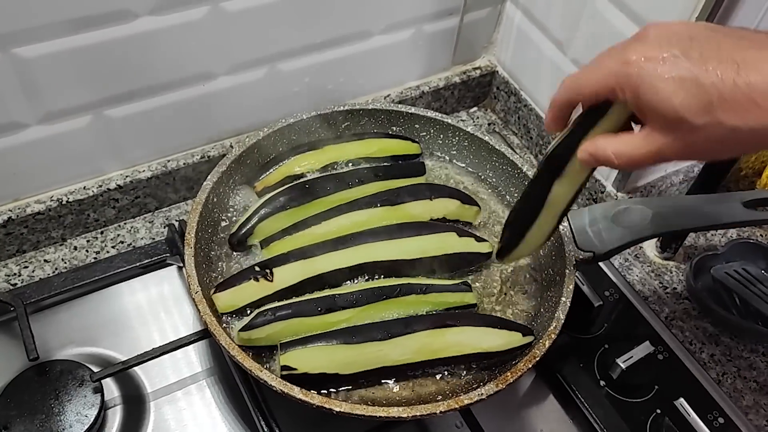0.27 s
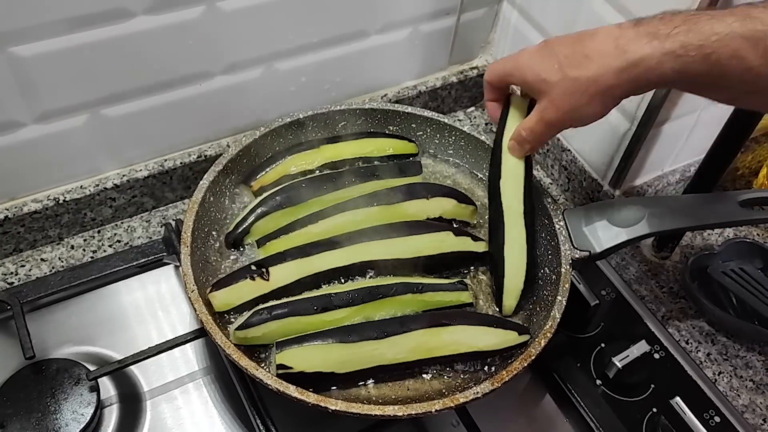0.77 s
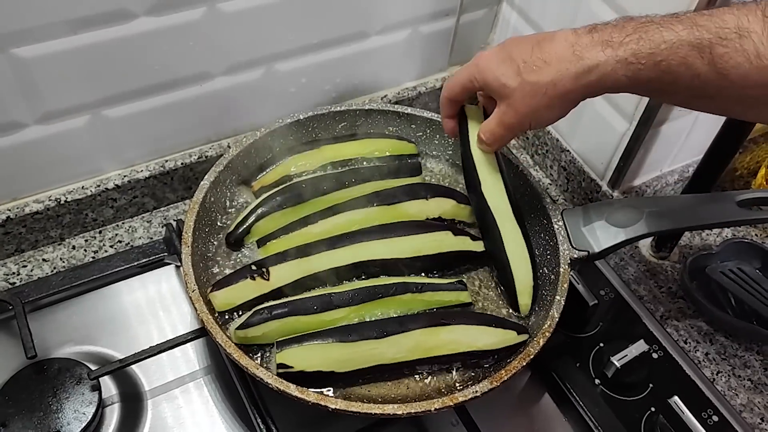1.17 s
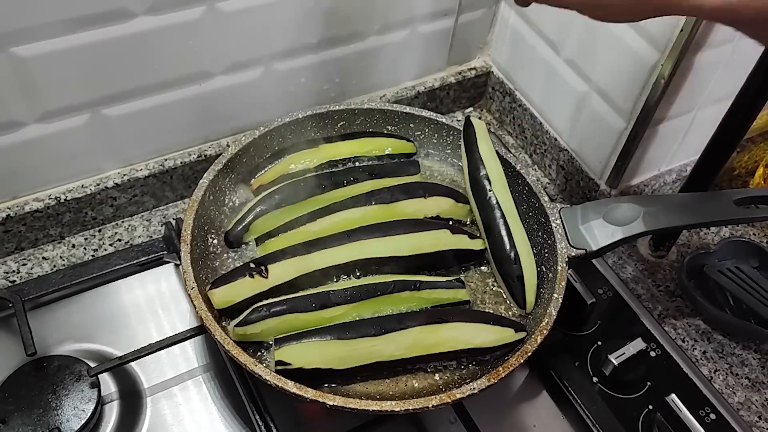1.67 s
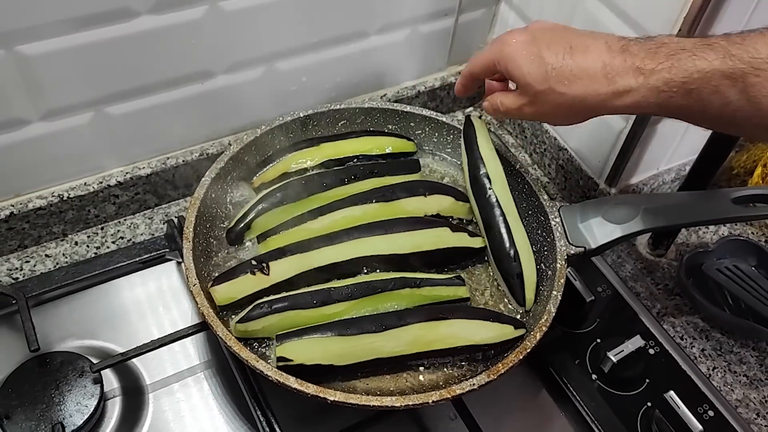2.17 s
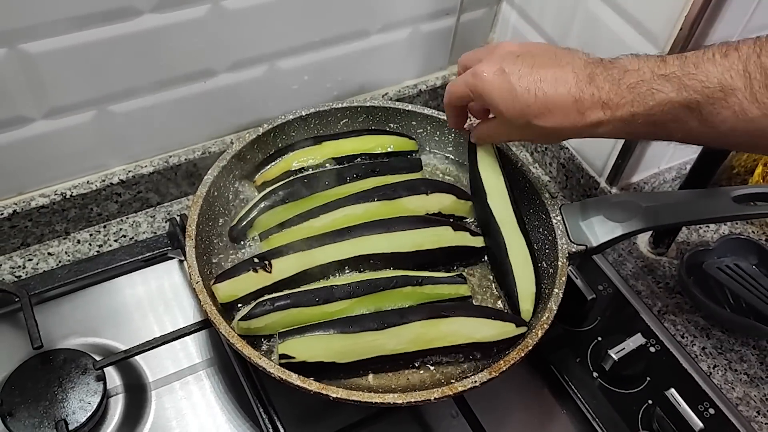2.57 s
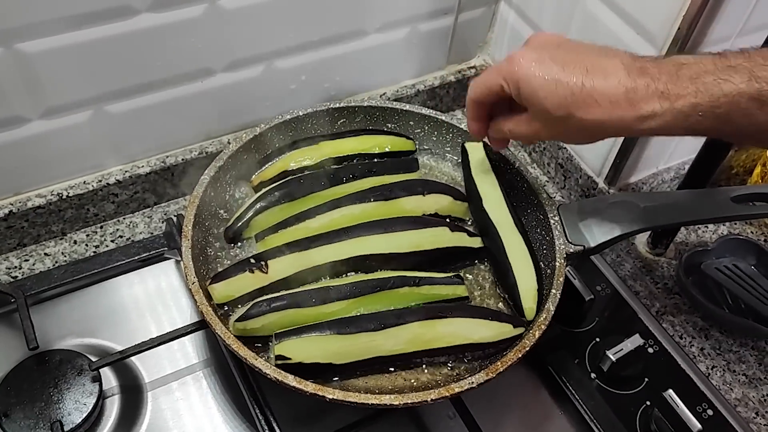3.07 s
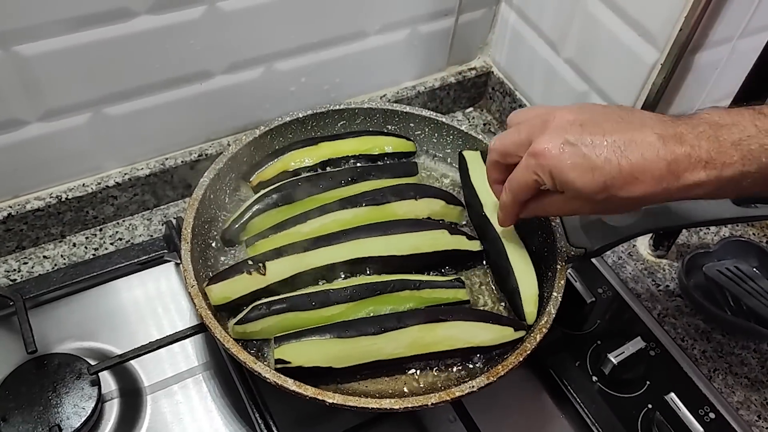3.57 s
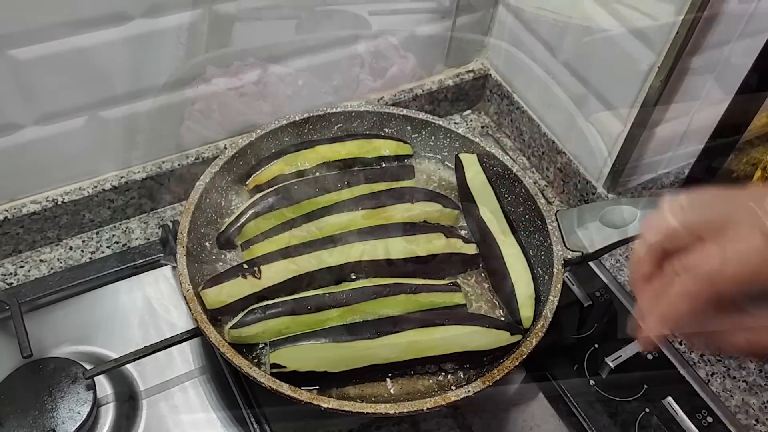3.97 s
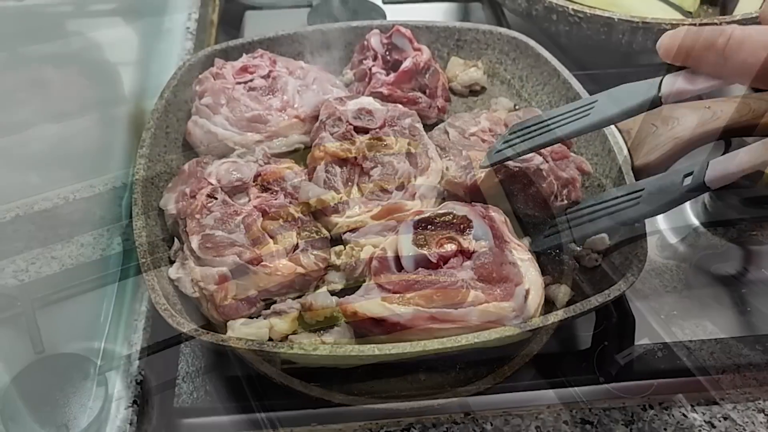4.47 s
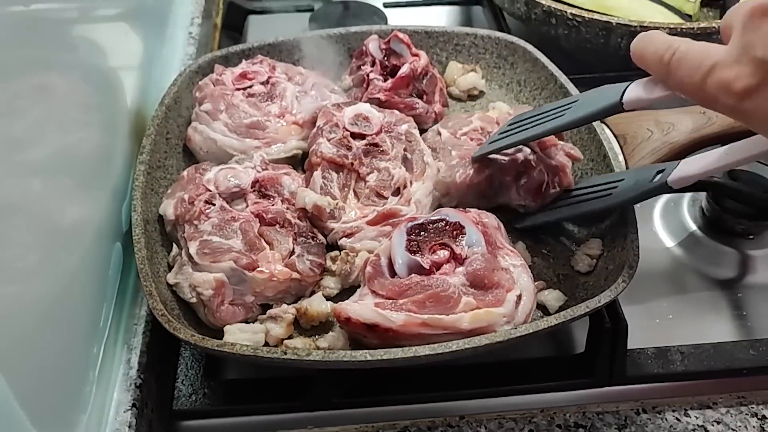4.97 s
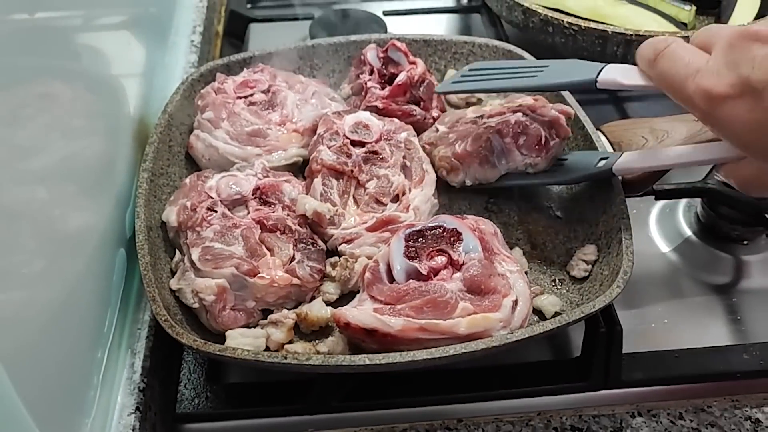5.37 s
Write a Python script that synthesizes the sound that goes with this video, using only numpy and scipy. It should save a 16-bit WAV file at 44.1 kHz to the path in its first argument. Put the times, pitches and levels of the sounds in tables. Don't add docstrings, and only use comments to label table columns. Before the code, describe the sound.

Close stereo sound of vegetable slices frying in a wide pan: a steady, dense hiss of tiny bubbles with wet pops, thin spits and sharp oil cracks. Just before four seconds it stops dead; after a tiny gap, meat frying in a second pan fades in, quieter at first, then stronger and more crackly. Hard tiles give short echoes; an extractor hood rumbles faintly.

```python
import sys
import numpy as np
from scipy import signal
from scipy.fft import rfft, irfft
from scipy.io import wavfile

SR = 44100
rng = np.random.default_rng(int(sys.argv[2]) if len(sys.argv) > 2 else 0)


def unload_wav(signal):
    wavfile.write(
        sys.argv[1],
        SR,
        np.round(np.clip(np.atleast_2d(signal).T, -1, 1) * 32767).astype(np.int16),
    )


def voltage_ratio(decibels):
    exponent = np.asarray(decibels, float) / 20
    return 10 ** exponent


N = 246959
CUT_S = 3.8772
SHOT_S = CUT_S + .03

# t/s, fizz level/dB
BOIL = [
    [(.05, -28.5), (1.0, -29), (2.2, -29), (2.8, -29), (3.3, -29.4), (3.8, -28.5)],
    [(4.2, -32), (4.55, -32.5), (4.76, -30.5), (4.9, -31), (5.1, -29), (5.31, -28.5), (5.55, -26.5)],
]


def sizzle(per_s, uneven_db, cycles, surge_db):
    # f/Hz, level/dB per Hz
    slices_colour = [(290, -27), (500, -15), (586, -15), (666, -17), (927, -14), (1030, -11), (1820, -3.5),
                     (2360, -4), (3060, -5.5), (3430, -3.5), (7560, -6.5), (8720, -5.5), (10400, -10),
                     (13800, -7.5), (15500, -8)]
    meat_colour = [(290, -31), (500, -13), (815, -13.5), (982, -6), (1200, -6.5), (1770, -1), (2570, -3),
                   (3280, -5), (3790, -2.5), (4840, -5), (6090, 1), (7670, -5), (8850, 0), (10100, -5.5),
                   (15500, -3.5)]
    # f/Hz, level/dB
    port_balance = [
        [(380, 5), (700, -7), (1200, -3.5), (1800, -4), (2700, -6.5), (4200, -4), (5500, -3), (6500, 2.5),
         (8000, -1.5), (10000, 5), (15000, 1.5)],
        [(380, -1), (700, -1), (1200, -1.5), (1800, -3.5), (2700, -4.5), (4100, -.5), (5200, -3), (6300, -2.5),
         (7600, -3.5), (8900, 2), (11000, 4), (15000, 1)],
    ]
    fizz_db = in_time(BOIL)
    bubbles_db = bubbling(fizz_db)
    surge = surge_db * drift(22)
    pitches = np.geomspace(600, 15000, 16)
    bursts = 0
    for hz in pitches:
        wait, size, place, sign = rng.random((int(hz * 4) + 3000, 4)).T
        gaps_s = -np.log(1 - wait) / per_s * pitches.sum() / hz
        at = (np.cumsum(gaps_s) * SR).astype(int)
        small = np.clip(np.log(hz / 3500) / np.log(6000 / 3500), 0, 1)
        level_db = (1 - small) * bubbles_db + small * fizz_db + surge + 0.29 * drift(35)
        burst_db = level_db[at % N] - uneven_db * np.log(1 - .98 * size)
        sizes = np.sign(sign - .5) * voltage_ratio(burst_db) * (at < N)
        aside = voltage_ratio(np.outer([1, -1], 1.15 * (place - .5)))
        lag = 6.0 + 26.0 * (place - .5)
        bursts = bursts + ring(at_ports(at, sizes * aside, lag), hz, cycles / hz)

    hz = np.clip(np.fft.rfftfreq(N, 1 / SR), 1, 15500)
    low_cut = (hz / 500) ** 2 / (1 + (hz / 500) ** 2)
    shots = np.split(np.arange(N), [round(SHOT_S * SR)])
    pans = []
    for colour, balance, part in zip([slices_colour, meat_colour], port_balance, shots):
        f, raw = signal.welch(bursts[:, part], SR, nperseg=128)
        flat = rfft(bursts) / np.sqrt(np.interp(hz, f, raw.mean(0)))
        gain = voltage_ratio(at_hz(colour, hz) + np.outer([.5, -.5], at_hz(balance, hz))) * low_cut
        pan = irfft(flat * gain, N)[:, part]
        steady = rms_one(pan / voltage_ratio(fizz_db[part]))
        pans.append(steady * voltage_ratio(fizz_db[part] + 4.0))
    return np.hstack(pans)


def bubbling(fizz_db):
    simmer_db, share, settle_s = -27.5, 0.16, 0.3
    return -31.5 + share * (fizz_db - simmer_db) - 0.3 * np.exp(-np.arange(N) / SR / settle_s)


def at_ports(at, sizes, lag):
    out = np.zeros((2, N))
    np.add.at(out[0], np.clip(at, 0, N - 1), sizes[0])
    np.add.at(out[1], np.clip(at + np.round(lag).astype(int), 0, N - 1), sizes[1])
    return out


def ring(clicks, hz, t60):
    r, w = voltage_ratio(-60 / (t60 * SR)), 2 * np.pi * hz / SR
    return signal.lfilter([0, np.sin(w)], [1, -2 * r * np.cos(w), r * r], clicks + 1e-18)


def pops():
    # t/s, left peak level/dB, right peak level/dB, right lag/ms, f/Hz
    big_bubbles = [(.0621, -19, -21, .5, 2060), (.1145, -24, -16, .3, 1800), (.1230, -21, -17, .4, 2300),
                   (.131, -24, -17, .3, 2900), (.184, -24, -16, .3, 3000), (.3615, -19, -17, 0, 2280),
                   (.3985, -28, -20, .4, 2140), (.442, -22, -18, -.2, 1870), (.5971, -20, -17, .5, 2100),
                   (.7082, -24, -14, -.1, 1950), (1.0863, -20, -14, .1, 1850), (1.2015, -19, -15, .5, 1650),
                   (1.2045, -24, -14, .1, 2070), (1.3842, -20, -27, -.1, 2360),
                   (1.4052, -25, -18, .3, 2200), (1.82, -24, -19, .3, 2800), (2.7645, -18, -16, .4, 2200),
                   (2.770, -24, -18, .3, 2150), (2.777, -26, -17, .1, 2150), (3.1438, -25, -13, -.1, 2000),
                   (3.3181, -24, -21, -.1, 2260), (4.5057, -29, -25, -.1, 1990),
                   (5.3474, -31, -23, .05, 2210), (5.4958, -30, -23, .5, 1940)]
    middling_bubbles = [(.0657, -21, -16, .3, 3500), (.3774, -20, -14, .3, 3150),
                        (.4416, -19, -15, -.05, 4150), (.5972, -12, -9, .3, 3400),
                        (.604, -18, -27, .05, 3440), (.6771, -22, -13, .3, 3300),
                        (.7262, -21, -16, .15, 3430), (.7307, -22, -12, .25, 3630),
                        (.8618, -27, -16, .05, 3400), (.9649, -24, -17, .25, 4700),
                        (1.0525, -28, -19, .3, 3690), (1.0862, -17, -13, .29, 3500),
                        (1.2569, -20, -16, .3, 3100), (2.3255, -22, -18, 0, 3240),
                        (2.3342, -26, -18, .1, 2000), (2.4703, -28, -16, .2, 3580),
                        (3.0596, -21, -17, .3, 4790), (4.4685, -22, -21, .15, 4510),
                        (4.5892, -26, -17, .15, 5500), (4.7817, -25, -19, .5, 3990),
                        (4.9998, -19, -15, .05, 5400), (5.0641, -19, -21, .05, 4670),
                        (5.4816, -19, -20, -.15, 5800), (5.5894, -25, -18, -.1, 3440)]
    thin_spits = [(.4106, -15, -16, .34, 9000), (.5973, -13, -20, .32, 8510), (.8624, -13, -14, .48, 8410),
                  (.8736, -15, -20, .5, 12340), (1.12, -14, -27, .4, 12750), (1.2032, -14, -20, .2, 8000),
                  (1.2566, -5, -9, .075, 13380), (2.1168, -10, -19, .5, 12170),
                  (2.3352, -11, -15, .1, 9500), (2.8716, -16, -16, .4, 10940),
                  (3.3867, -15, -12, .41, 12060), (3.6393, -15, -13, .36, 11130),
                  (3.7832, -14, -22, -.2, 11520), (4.7307, -13, -19, .45, 12250),
                  (4.7512, -16, -20, .1, 10510), (4.9999, -15, -18, .1, 10660),
                  (5.0663, -16, -16, .24, 12670), (5.0799, -16, -17, -.1, 9350),
                  (5.1866, -19, -15, .05, 8410), (5.217, -19, -17, 0, 8280), (5.4171, -18, -8, -.2, 8500),
                  (5.4456, -17, -12, 0, 7300), (5.4696, -17, -13, -.1, 9070), (5.4817, -18, -14, 0, 7250)]
    oil_cracks = [(.4415, -14, -11, -.02, 3500), (.4512, -17, -12, 0, 3500), (.4993, -13, -15, .05, 4000),
                  (.5971, -7, -7, .2, 5200), (.8622, -14, -14, .2, 6000), (1.2566, -11, -13, .05, 7000),
                  (1.284, -14, -14, 0, 7000), (1.453, -8, -14, 0, 10000), (1.9769, -19, -13, .1, 4500),
                  (2.3342, -16, -16, .1, 6000), (4.5142, -15, -16, 0, 6000), (4.7822, -19, -15, 0, 7000),
                  (4.9073, -20, -16, .1, 6500), (4.9904, -13, -14, .05, 6000), (4.9998, -15, -14, 0, 6000),
                  (5.0201, -15, -17, 0, 7000), (5.0799, -15, -16, 0, 7000), (5.1113, -19, -13, .05, 9000),
                  (5.1309, -19, -14, .1, 7000), (5.166, -18, -12, 0, 6500), (5.2386, -16, -15, 0, 8000),
                  (5.4171, -16, -11, 0, 6000), (5.4956, -15, -14, 0, 3500), (5.5474, -10, -18, .09, 9500)]
    kinds = [(big_bubbles, 3.1), (middling_bubbles, 3.0), (thin_spits, 3.8), (oil_cracks, 1.1), (strays(), 2.0)]
    out = np.zeros((2, N + SR))
    t = np.arange(int(.02 * SR)) / SR
    for rows, cycles in kinds:
        for s, left_db, right_db, lag_ms, hz in rows:
            swell_s = cycles / hz / 4.5
            envelope = np.sqrt(t / swell_s * np.exp(1 - t / swell_s))
            burst = envelope * np.sin(2 * np.pi * hz * t)
            for port, (db, late_s) in enumerate([(left_db, 0), (right_db, lag_ms / 1000)]):
                at = round((s + late_s - swell_s) * SR)
                out[port, at:at + len(t)] += voltage_ratio(db + 1.0) * burst
    thinned = signal.lfilter(*signal.butter(2, 900, "high", fs=SR), out[:, :N])
    return kitchen(thinned)


def strays():
    per_s, over_fizz_db, low_hz, high_hz = 14.0, 6.5, 2200, 11700
    wait, size, side, place, pitch = rng.random((200, 5)).T
    s = .03 + np.cumsum(-np.log(1 - wait)) / per_s
    db = in_time(BOIL)[(s * SR).astype(int) % N] + over_fizz_db - 3.0 * size
    pan_db = 7.8 * (side - .5)
    lag_ms = 0.22 + 0.47 * (place - .5)
    hz = low_hz * (high_hz / low_hz) ** pitch
    rows = np.transpose([s, db + pan_db / 2, db - pan_db / 2, lag_ms, hz])
    return rows[s < N / SR]


def kitchen(x):
    # t/s, left level/dB, right level/dB
    echoes = [
        (.0021, -6, -5),
        (.0044, -11, -9),
        (.0066, -9, -11),
        (.008, -13, -10),
        (.0108, -12, -14),
        (.0135, -14, -14),
    ]
    t60_s, wall_cut_hz = .1, 3500
    t = np.arange(int(.15 * SR)) / SR
    tail = rng.standard_normal((2, len(t))) * voltage_ratio(-60 * t / t60_s) * np.clip(t / 0.0035, 0, 1)
    reply = voltage_ratio(-2.0) * rms_one(tail) / np.sqrt(len(t))
    for s, left_db, right_db in echoes:
        reply[:, round(s * SR)] += voltage_ratio(np.array([left_db, right_db]))
    reply = signal.lfilter(*signal.butter(1, wall_cut_hz, fs=SR), reply)
    return x + signal.oaconvolve(x, reply, axes=1)[:, :N]


def hood():
    # t/s, level/dB
    draught = [
        [(0, -55.5), (.3, -58.5), (1.3, -59), (1.8, -53.5), (2.1, -61.5), (2.75, -57), (3.2, -55), (3.8, -56)],
        [(4.1, -62), (4.3, -61), (4.85, -61), (5.6, -65)],
    ]
    # f/Hz, width/Hz, level/dB
    duct_modes = [(62, 5, -11.5), (85, 33, -3), (112.5, 12.6, 2), (132.4, 34, -10.5)]
    casing_modes = [(203.2, 23, -3), (246.3, 29, -0.5), (162, 63, -5.5)]
    air_modes = [(338, 153, -4), (469.4, 30, 0), (590, 39, 2.5), (777, 330, -1.5), (931, 93, 2)]
    rumble = voltage_ratio(-64.5) * hum([(41.4, 28, 0)], 0.46, 1.8)
    duct = voltage_ratio(in_time(draught) + 3.5) * hum(duct_modes, 0.98, 1.7)
    casing = voltage_ratio(by_shot(-59, -58.5) + 0.73 * drift(0.77)) * hum(casing_modes, 0.86, 1.8)
    air = voltage_ratio(by_shot(-48, -53) + 1.2 * drift(1.9)) * hum(air_modes, 0.75, 2.7)
    return rumble + duct + casing + air


def hum(modes, alike, left_db):
    mid, side = sum(voltage_ratio(db) * resonance(hz, width) for hz, width, db in modes)
    ports = np.sqrt(1 + alike) * mid + np.sqrt(1 - alike) * side * [[1], [-1]]
    return rms_one(ports) * voltage_ratio(left_db * np.array([[.5], [-.5]]))


def resonance(hz, width):
    r = np.exp(-np.pi * width / SR)
    sos = [[1 - r * r, 0, r * r - 1, 1, -2 * r * np.cos(2 * np.pi * hz / SR), r * r]] * 2
    noise = rng.standard_normal((2, N + SR // 2))
    return signal.sosfilt(sos, noise)[:, SR // 2:] * voltage_ratio(drift(3.3))


def drift(rate):
    r = np.exp(-80 * np.pi * rate / SR)
    slow = signal.lfilter([1], [1, -2 * r, r * r], rng.standard_normal(N // 40 + 2002))[2000:]
    return np.interp(np.arange(N) / 40, np.arange(len(slow)), rms_one(slow))


def by_shot(first, second):
    return np.where(np.arange(N) / SR < SHOT_S, first, second)


def in_time(tables):
    t = np.arange(N) / SR
    first, second = [np.interp(t, *np.transpose(table)) for table in tables]
    return by_shot(first, second)


def at_hz(points, hz):
    f, db = np.transpose(points)
    return np.interp(np.log(hz), np.log(f), db)


def rms_one(x):
    return x / np.sqrt(np.mean(x ** 2) + 1e-20)


def scene():
    return sizzle(per_s=18000, uneven_db=0.5, cycles=3.43, surge_db=0.44) + pops() + hood()


def roll_off(x):
    return signal.sosfilt(signal.butter(12, 17080, fs=SR, output="sos"), x)


def record(dry):
    fade_from_s, fade_s, fade_bend = 3.933, .31, .64
    t = np.arange(N) / SR
    fade_in = np.clip((t - fade_from_s) / fade_s, 0, 1) ** fade_bend
    edited = dry * np.where(t < CUT_S, 1, fade_in)
    top_cut = signal.ellip(12, .5, 75, 15760, fs=SR, output="sos")
    return roll_off(signal.sosfilt(top_cut, edited))


dry = scene()
out = record(dry)
unload_wav(out)
```